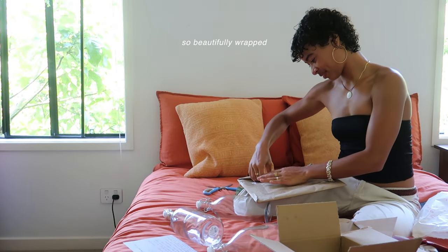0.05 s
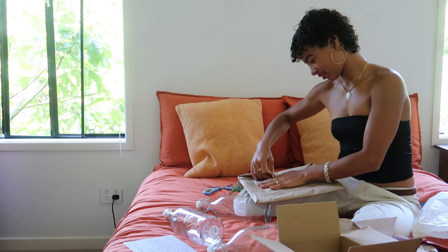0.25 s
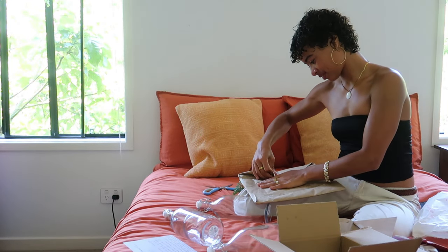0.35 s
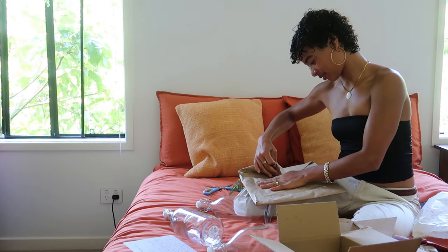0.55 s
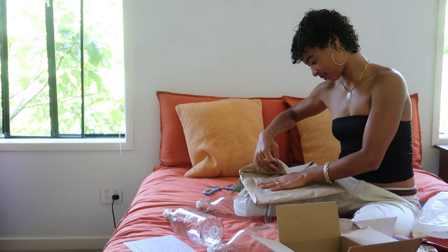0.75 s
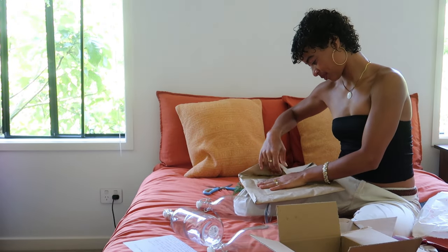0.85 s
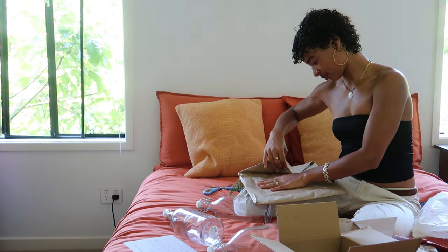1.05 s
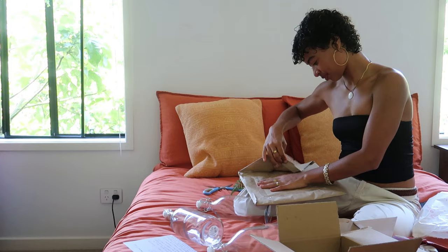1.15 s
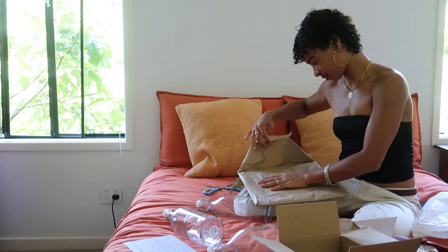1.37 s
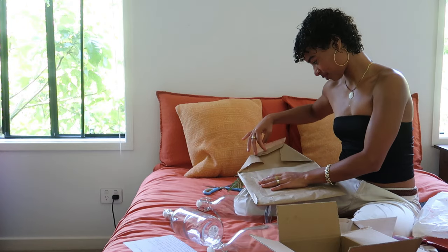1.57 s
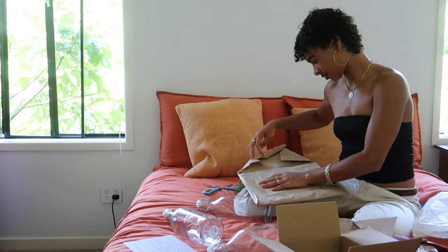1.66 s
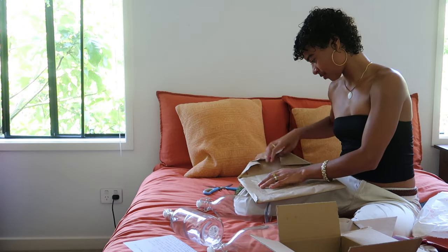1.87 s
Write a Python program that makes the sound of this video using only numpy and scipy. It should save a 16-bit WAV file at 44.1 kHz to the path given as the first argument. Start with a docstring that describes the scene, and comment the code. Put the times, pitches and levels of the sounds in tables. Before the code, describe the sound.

Thick, stiff paper rustles as a parcel is opened by hand. Faint rubs and ticks at first, busier dry crinkling and crease snaps from 0.2 to 0.85 s, a softer dip near 0.95 s, then a building scrape. At about 1.26 s the flap pops free with loud snaps and a small hollow knock. Lighter crackles fade toward 1.9 s. Close stereo, live quiet bedroom, faint air noise.

```python
"""Hands open a parcel of thick wrapping paper on a bed, in a quiet, fairly live bedroom with faint air noise.
First, fingers slide under the fold in short strokes: swarms of tiny slips, filtered by the sheet.
Creases snap (noise bursts), buckles zip along folds and the flap's hollow rings as it lifts (resonators).
At 1.26 s the flap pops free with loud snaps and a knock (decaying sines).
Then it settles in fainter strokes. Low puffs of band-passed noise mark pushes throughout."""
import sys
import numpy as np
from scipy import signal
from scipy.fft import rfft, irfft
from scipy.io import wavfile
from scipy.ndimage import uniform_filter1d

SR = 44100
rng = np.random.default_rng(int(sys.argv[2]) if len(sys.argv) > 2 else 0)


def wrap_up_sound(samples):
    """Save the sound to the file named by the first command line argument, as 16-bit audio."""
    columns = np.atleast_2d(samples).T
    # keep every value between -1 and 1, then stretch to whole-number steps
    tamed = np.clip(columns, -1, 1)
    steps = np.round(tamed * 32767).astype(np.int16)
    wavfile.write(sys.argv[1], SR, steps)


N = 83790

# Paper strokes, levels before RUSTLE_TRIM_DB: start_s, length_s, rasp_db, crackle_db, body_db
STROKES = [(-.01, 0.079, -39, -46, -60), (0.093, 0.034, -44, -50.5, -59), (0.146, 0.032, -37.5, -42.5, -54),
           (0.184, 0.022, -42.5, -49, -47), (0.209, 0.048, -33, -39, -46.5),
           (0.223, 0.058, -31, -45.5, -51.5), (0.308, 0.03, -32.5, -35, -49),
           (0.34, 0.042, -28, -33.5, -41), (0.364, 0.046, -31, -39, -50), (0.412, 0.024, -33.5, -56, -48),
           (0.465, 0.051, -34, -39.5, -53), (0.484, 0.041, -29.5, -36.5, -40),
           (0.521, 0.069, -32, -33, -38.5), (0.601, 0.06, -30, -33.5, -41),
           (0.675, 0.04, -30.5, -32.5, -38.5), (0.72, 0.048, -29.5, -35.5, -39.5),
           (0.769, 0.045, -26.5, -32, -37.5), (0.845, 0.07, -35, -43.5, -43.5),
           (0.925, 0.085, -41, -41.5, -45), (1.008, 0.059, -37.5, -47, -46.5),
           (1.074, 0.056, -34, -37.5, -67), (1.109, 0.03, -27, -36, -42), (1.133, 0.074, -29, -33, -32),
           (1.196, 0.086, -30, -32.5, -36.5), (1.252, 0.022, -20.5, -22, -29.5),
           (1.351, 0.054, -38, -63, -49), (1.428, 0.023, -34, -42, -42.5), (1.452, 0.03, -32, -36, -33),
           (1.49, 0.04, -41, -58, -40.5), (1.553, 0.029, -43, -44.5, -59),
           (1.611, 0.048, -43.5, -50.5, -44.5), (1.64, 0.032, -40.5, -45, -54),
           (1.67, 0.054, -46.5, -73, -61), (1.776, 0.028, -51, -51.5, -59), (1.858, 0.026, -47, -57, -51.5)]
ATTACK_S, RELEASE_S, RUSTLE_TRIM_DB = 0.012, 0.011, -1.16
# Free span of paper, shifts the rasp as it grows and shrinks: time_s, pitch_hz
SPAN = [(0, 3030), (.17, 2650), (.25, 1930), (.40, 1850), (.50, 1620), (.60, 1680), (.72, 1950),
        (.81, 1630), (.90, 2200), (1.0, 2170), (1.13, 2220), (1.38, 2280), (1.47, 1920), (1.66, 2280),
        (1.87, 2640)]
SPAN_WIDTH_HZ, SPAN_DB = 1100, -3.5
# Jerky catches: level against the steady rasp, ring width
CATCH_DB, CATCH_WIDTH_HZ = -13, 660
# Facets of the sheet: pitch preference (+/- dB), period of the ripple
FACET_DB, FACET_OCTAVES = 2.5, 2.385
# Rasp colour: freq_hz, density_db (per Hz)
RASP = [(100, -72.5), (400, -18.5), (900, -11.5), (1200, -1), (1500, 0), (2300, 1), (3400, 4), (5000, -8),
        (8000, -10.5), (15000, -40.5)]
# Fibre crackle colour: freq_hz, density_db (per Hz)
CRACKLE = [(300, -31.5), (1500, -0.5), (3000, -22.5), (4500, 4), (6200, -0.5), (8000, -3), (10500, -3),
           (13000, -4), (15000, -18)]
# Hollow sheet body colour: freq_hz, density_db (per Hz)
BODY = [(50, -43), (130, -7.5), (210, -6), (340, -1), (480, -3.5), (850, -0.5), (1300, -8.5), (2500, -7.5),
        (8000, -66)]
# Resonances of the folded parcel: centre_hz, width_hz, lift_db
PARCEL = [(346, 36, 3), (1393, 53, 3.5), (1463, 53, 3.5), (1596, 64, 4), (1868, 23, 7), (2049, 56, 6.5),
          (2340, 69, 3), (2538, 76, 3), (2920, 39, 3), (4050, 39, 4.5), (4530, 43, -3.5)]

# Snapping creases, levels before SNAP_GAIN_DB: start_s, level_db, pitch_hz
SNAPS = [(.0195, -40, 3240), (.0438, -29.5, 3180), (.0495, -29, 4530), (.2344, -32, 5000),
         (.2715, -32, 2200), (.3207, -38, 4800), (.3485, -24, 2570), (.3536, -32, 4200),
         (.508, -22.5, 1780), (.517, -24, 1900), (.528, -30.5, 1700), (.584, -22, 1800), (.643, -33, 3760),
         (.6495, -26, 2680), (.6913, -44, 4960), (.728, -28.5, 2400), (.7795, -27, 2100),
         (.797, -24.5, 2600), (.806, -29, 2220), (.862, -24.5, 2740), (.868, -24.5, 2900),
         (.982, -25, 2760), (0.9857, -21, 3300), (.9947, -29.5, 4300), (1.0829, -33, 6050),
         (1.2672, -27, 3270), (1.2705, -19.5, 3230), (1.2765, -17.5, 2460), (1.2792, -13, 2200),
         (1.306, -30, 2800), (1.342, -37, 3400), (1.375, -27, 2480), (1.386, -35, 2280),
         (1.396, -31.5, 2020), (1.435, -28, 2830), (1.4562, -23, 2120), (1.465, -28, 2600),
         (1.478, -29, 2600), (1.505, -31, 2700), (1.6011, -31.5, 2300), (1.7835, -40, 3630),
         (1.864, -37.5, 2830), (1.873, -37, 2600)]
# Snap colour for a crease at SNAP_CENTRE_HZ: freq_hz, density_db (per Hz)
SNAP_COLOUR = [(100, -11), (600, -20), (1300, -11.5), (2200, 3), (3200, 0.5), (4500, -6), (7000, -14),
               (11000, -28), (15000, -47)]
SNAP_CENTRE_HZ, SNAP_GAIN_DB = 2600, 18.5
SNAP_RISE_S, SNAP_DECAY_S = 0.00052, 0.0027

# Buckles running along a fold: start_s, length_s, first_pitch_hz, last_pitch_hz, level_db
ZIPS = [(.629, 0.0252, 3170, 4800, -33), (0.73, 0.048, 2200, 2530, -31.5),
        (0.499, 0.052, 1370, 1650, -31.5), (.228, .045, 1950, 2100, -39), (1.863, 0.031, 2730, 2350, -44)]
ZIP_WIDTH_HZ = 540
# Ringing hollow under the lifted flap: start_s, length_s, first_pitch_hz, last_pitch_hz, level_db
HOLLOWS = [(1.116, 0.105, 354, 340, -41), (1.214, .065, 373, 410, -37), (1.451, 0.069, 345, 325, -43.5),
           (1.64, 0.072, 562, 555, -47.5)]
HOLLOW_WIDTH_HZ = 26
# Knocks of the freed flap on the parcel: start_s, pitch_hz, level_db
KNOCKS = [(1.259, 158.6, -31.5), (1.296, 161, -37)]
KNOCK_RISE_S, KNOCK_DECAY_S = 0.0011, 0.024
# Soft pushes on parcel and bedding: start_s, energy_decay_s, pitch_hz, level_db
PUSHES = [(-.004, 0.053, 45.6, -41.5), (0.186, 0.011, 95, -51), (0.23, 0.019, 73, -45),
          (0.354, 0.045, 59.4, -52), (1.26, 0.023, 91, -42.5), (1.491, 0.017, 100, -47)]
PUSH_RISE_S = 0.0043

# Bedroom decay: freq_hz, t60_s
ROOM = [(150, 0.36), (600, 0.6), (2000, 0.47), (6000, 0.42), (14000, 0.23)]
ROOM_DB, ROOM_DELAY_S, REFLECTIONS_PER_S = -7, 0.012, 4000
# Room air: freq_hz, density_db (per Hz)
AIR = [(20, -4), (60, -2.5), (125, 4), (210, -6), (500, -7.5), (1200, -14.5), (4000, -13.5), (9000, -23.5),
       (15000, -61.5)]
AIR_DB = -49
# Paper is in front, its reflections come from all round
DIRECT_SIDE_DB, ROOM_SIDE_DB = -4.5, 2
# Two microphone ports a little apart: freq_hz, side_over_mid_gain_db
WIDTH = [(25, -44), (125, -42), (500, -50), (1000, -19), (1700, -24.5), (2600, -18), (4000, -6),
         (5500, -3.5), (7000, 2), (9500, 5.5), (14000, 14.5)]
# Faint noise that differs between the ports: freq_hz, density_db (per Hz)
PORT_NOISE = [(20, -26), (60, -15), (125, -3.5), (350, 4), (700, -2.5), (1400, -4), (3000, -11),
              (7000, -29), (15000, -39)]
PORT_NOISE_DB = -58
EDGE_HZ = 15100


def amp(db):
    """Decibels to gain."""
    return 10 ** (np.asarray(db) / 20)


def read(points, hz):
    """Reads a table on a log-frequency axis."""
    f, value = np.transpose(points)
    return np.interp(np.log(hz + 1), np.log(f + 1), value)


def evened(x):
    """Scales to unit rms."""
    return x / np.sqrt(np.mean(x ** 2) + 1e-20)


def convolve(x, response):
    """Filters mid and side, cut to the scene's length."""
    return signal.oaconvolve(x, np.atleast_2d(response), axes=1)[:, :N]


def colour(x, points, peaks=()):
    """Causal (minimum-phase) filter of unit energy: broad colour plus narrow resonances."""
    hz = abs(np.fft.fftfreq(8192, 1 / SR))
    db = read(points, hz)
    for centre_hz, width_hz, lift_db in peaks:
        db = db + lift_db / (1 + (2 * (hz - centre_hz) / width_hz) ** 2)
    spectrum = np.exp(np.conj(signal.hilbert(np.log(amp(db)))))
    response = np.fft.ifft(spectrum).real[:len(hz) // 2]
    return convolve(x, response / np.linalg.norm(response))


def resonate(x, hz, width_hz):
    """Resonance of peak gain 1 that follows the curve hz: shift to 0 Hz, one-pole low-pass, shift back."""
    turn = np.exp(2j * np.pi * np.cumsum(hz) / SR)
    pole = np.exp(-np.pi * width_hz / SR)
    return 2 * (turn * signal.lfilter([1 - pole], [1, -pole], x / turn)).real


def glide(start_s, length_s, from_hz, to_hz):
    """Swell and linear pitch path of one moving resonance."""
    way = np.clip((np.arange(N) / SR - start_s) / length_s, 0, 1)
    return np.sqrt(abs(np.sin(np.pi * way))), from_hz + (to_hz - from_hz) * way


def levelled(ring, swell, level_db):
    """Gives each channel level_db rms relative to its swell."""
    return amp(level_db) * ring * np.linalg.norm(swell) / np.linalg.norm(ring, axis=1, keepdims=True)


def slips(per_s, spread_db, clump_db, clump_s):
    """Tiny clicks of uneven size in clumps, with independent signs in mid and side."""
    pole = np.exp(-1 / (SR * clump_s))
    clumps = evened(signal.lfilter([1], [1, -pole], rng.standard_normal(N)))
    size = amp(spread_db * np.minimum(rng.exponential(1, N), 4) + clump_db * clumps)
    clicks = size * (rng.random(N) < per_s / SR)
    # even out the level over 29 ms
    clicks /= np.sqrt(abs(uniform_filter1d(clicks ** 2, size=1300)) + 1e-9)
    return clicks * rng.choice([-1., 1.], (2, N))


def facets(clicks, count=5):
    """Each slip falls on one of a few facets of the sheet and takes its colour."""
    hz = np.geomspace(500, 16000, 32)
    octaves = np.log2(hz / hz[0])
    facet = rng.integers(0, count, N // 64 + 1).repeat(64)[:N]  # redrawn every 64 samples
    out = np.zeros((2, N))
    for k in range(count):
        ripple_db = FACET_DB * np.cos(2 * np.pi * (octaves / FACET_OCTAVES + k / count))
        out += colour(clicks * (facet == k), np.column_stack([hz, ripple_db]))
    return evened(out)


def pressure(column):
    """Each stroke swells, holds and lets go; overlapping strokes add in power."""
    t, power = np.arange(N) / SR, np.zeros(N)
    for start_s, length_s, *levels_db in STROKES:
        attack = np.clip((t - start_s) / ATTACK_S, 0, 1)
        release = np.exp(-np.maximum(t - start_s - length_s, 0) / RELEASE_S)
        power += (amp(levels_db[column]) * attack * release) ** 2
    return np.sqrt(power)


def rustle():
    """Paper rasps on paper and catches in uneven jerks, fibres crackle, the bending sheet sounds hollow."""
    span_hz = np.interp(np.arange(N) / SR, *np.transpose(SPAN))
    rub = facets(slips(per_s=5000, spread_db=3.0, clump_db=0.5, clump_s=0.00063))
    rub = rub + amp(SPAN_DB) * resonate(rub, span_hz, SPAN_WIDTH_HZ)
    jerks = slips(per_s=170, spread_db=1.5, clump_db=1.5, clump_s=0.0082)
    catches = resonate(jerks, span_hz, CATCH_WIDTH_HZ)
    steady = evened(colour(rub, RASP, PARCEL))
    jerky = evened(colour(catches, RASP, PARCEL))
    rasp = pressure(0) * evened(steady + amp(CATCH_DB) * jerky)

    fibres = facets(slips(per_s=2600, spread_db=-2.0, clump_db=-0.7, clump_s=0.0075))
    crackle = pressure(1) * evened(colour(fibres, CRACKLE))

    bending = slips(per_s=3200, spread_db=1.6, clump_db=1.0, clump_s=0.013)
    body = colour(pressure(2) * bending, BODY, PARCEL)
    return amp(RUSTLE_TRIM_DB) * (rasp + crackle + body)


def snaps():
    """A crease buckles in a brief splintering noise burst; small creases sound higher."""
    t, out = np.arange(2048) / SR, np.zeros((2, N))
    envelope = np.minimum(t / SNAP_RISE_S, 1) * np.exp(-t / SNAP_DECAY_S)
    for start_s, level_db, pitch_hz in SNAPS:
        splinters = envelope * rng.standard_normal((2, len(t)))
        shifted_colour = np.multiply(SNAP_COLOUR, [pitch_hz / SNAP_CENTRE_HZ, 1])
        crack = colour(splinters, shifted_colour, PARCEL)
        crack /= np.linalg.norm(crack, axis=1, keepdims=True)
        part = out[:, round(start_s * SR):][:, :crack.shape[1]]
        part += amp(level_db + SNAP_GAIN_DB) * crack[:, :part.shape[1]]
    return out


def zips():
    """A buckle runs along a fold: a quick string of clicks through a gliding double resonance."""
    out = np.zeros((2, N))
    for *path, level_db in ZIPS:
        swell, hz = glide(*path)
        clicks = swell * slips(per_s=1200, spread_db=5, clump_db=1.5, clump_s=0.0025)
        ring = resonate(resonate(clicks, hz, ZIP_WIDTH_HZ), hz, ZIP_WIDTH_HZ)
        out += levelled(ring, swell, level_db)
    return out


def hollows():
    """The dragging edge sets the pocket under the flap ringing; its pitch moves as the pocket opens."""
    out = np.zeros((2, N))
    for *path, level_db in HOLLOWS:
        swell, hz = glide(*path)
        ring = swell * resonate(rng.standard_normal((2, N)), hz, HOLLOW_WIDTH_HZ)
        out += levelled(ring, swell, level_db)
    return out


def knocks():
    """The freed flap gives the parcel a light, hollow knock: a decaying sine."""
    out = np.zeros(N)
    for start_s, pitch_hz, level_db in KNOCKS:
        age = np.maximum(np.arange(N) / SR - start_s, 0)
        envelope = np.minimum(age / KNOCK_RISE_S, 1) * np.exp(-age / KNOCK_DECAY_S)
        out += amp(level_db) * envelope * np.sin(2 * np.pi * pitch_hz * age)
    return out


def pushes():
    """Dull, low puffs of two-octave noise as the parcel is pressed and the flap pops free."""
    t, out = np.arange(N) / SR, np.zeros((2, N))
    for start_s, decay_s, pitch_hz, level_db in PUSHES:
        band = signal.butter(2, [pitch_hz / 2, pitch_hz * 2], "band", fs=SR, output="sos")
        puff = evened(signal.sosfilt(band, rng.standard_normal((2, N))))
        age = np.maximum(t - start_s, 0)
        envelope = np.minimum(age / PUSH_RISE_S, 1) * np.exp(-age / (2 * decay_s))
        out += amp(level_db) * envelope * puff
    return out


def bedroom(x):
    """Sparse reflections of random sign, each band dying at its own speed."""
    signs = rng.choice([-1., 1.], (2, SR // 2))
    taps = signs * (rng.random((2, SR // 2)) < REFLECTIONS_PER_S / SR)
    hz, t, bands = signal.stft(taps, SR, nperseg=256)
    decay = amp(-60 * t / read(ROOM, hz)[:, None])
    tail = signal.istft(bands * decay, SR)[1]
    tail *= np.arange(tail.shape[1]) > ROOM_DELAY_S * SR
    return amp(ROOM_DB) * convolve(x, tail / np.linalg.norm(tail[0]))


def room_air():
    """Steady coloured noise, independent in mid and side."""
    return amp(AIR_DB) * colour(rng.standard_normal((2, N)), AIR)


def port_noise():
    """Faint coloured noise of opposite sign at the two ports."""
    return amp(PORT_NOISE_DB) * colour(rng.standard_normal((1, N)), PORT_NOISE)[0]


def ports(sound):
    """Mid and side to two ports that agree in the bass and oppose in the treble."""
    width = amp(read(WIDTH, np.fft.rfftfreq(2 * N, 1 / SR)))
    # side turned by 90 degrees; squared gains sum to 1
    gains = [np.ones_like(width), 1j * width] / np.hypot(1, width)
    mid, side = irfft(rfft(sound, 2 * N) * gains)[:, :N]
    side = side + port_noise()
    return np.array([mid + side, mid - side])


def scene():
    """Paper, its reflections, pushes and air at two ports; knocks equal in both."""
    paper = rustle() + snaps() + zips() + hollows()
    air = room_air()
    direct = paper * amp([[0], [DIRECT_SIDE_DB]])
    reflected = bedroom(paper) * amp([[0], [ROOM_SIDE_DB]])
    return ports(direct + reflected + pushes() + air) + knocks()


def record(dry):
    """Linear-phase low-pass at EDGE_HZ."""
    lowpass = signal.firwin(511, EDGE_HZ, window=("kaiser", 9), fs=SR)
    return signal.oaconvolve(dry, lowpass[None], "same", axes=1)


dry = scene()
out = record(dry)
wrap_up_sound(out)
```